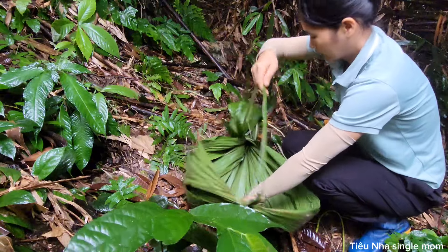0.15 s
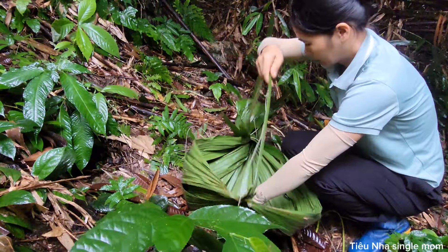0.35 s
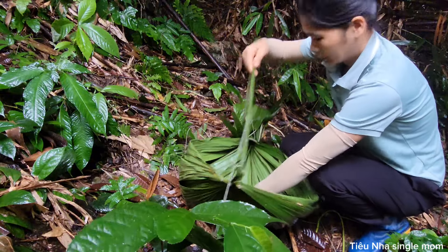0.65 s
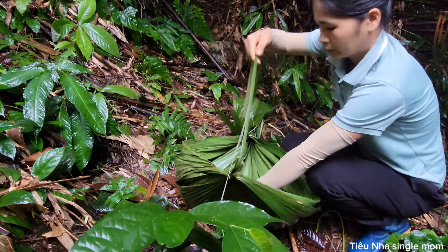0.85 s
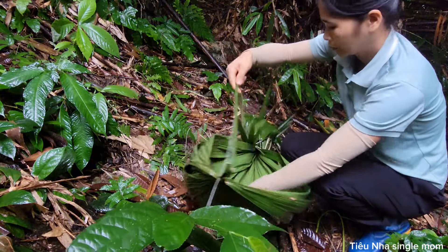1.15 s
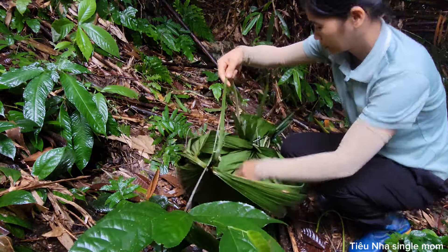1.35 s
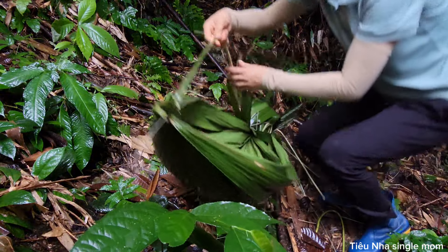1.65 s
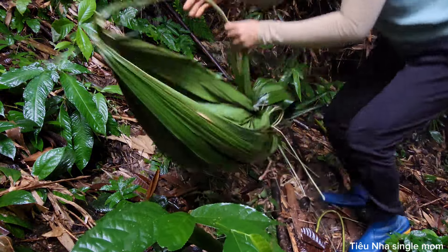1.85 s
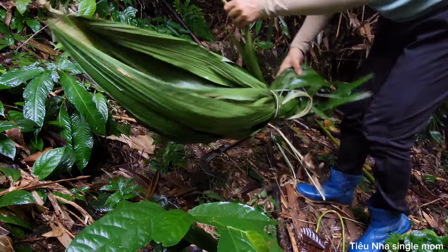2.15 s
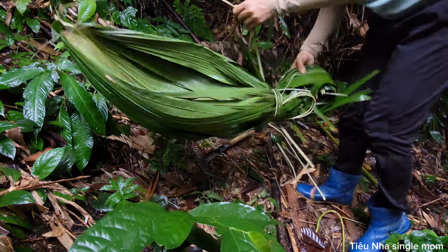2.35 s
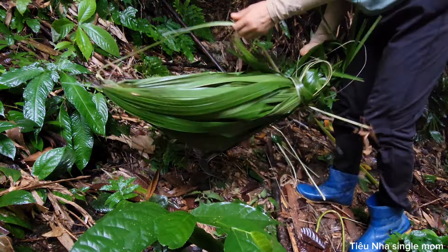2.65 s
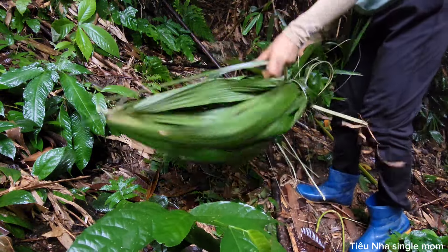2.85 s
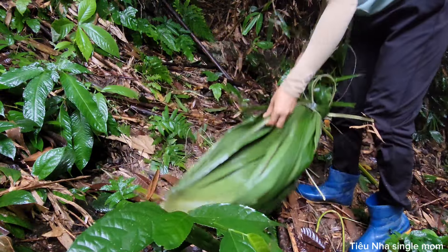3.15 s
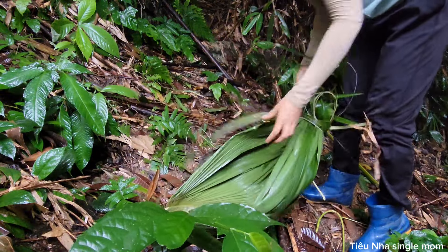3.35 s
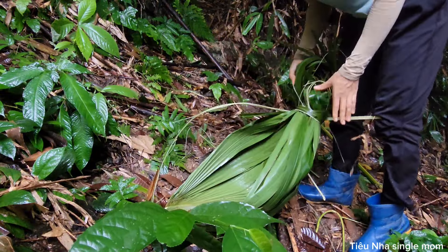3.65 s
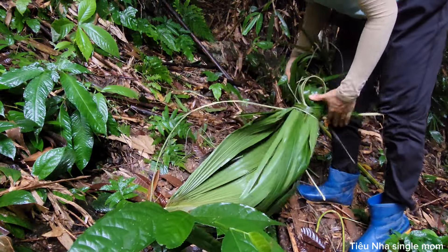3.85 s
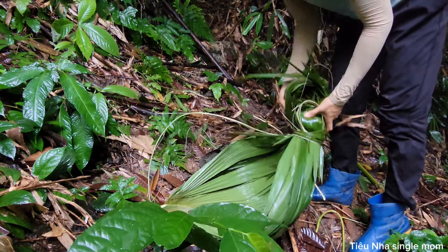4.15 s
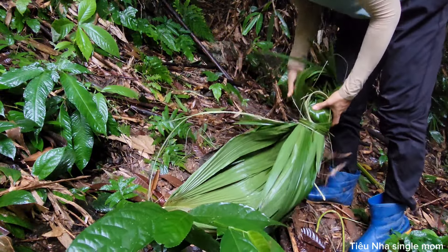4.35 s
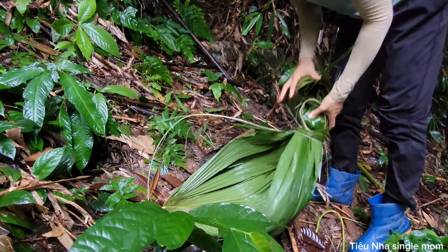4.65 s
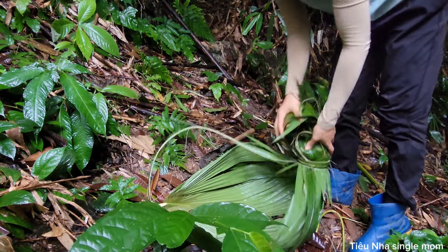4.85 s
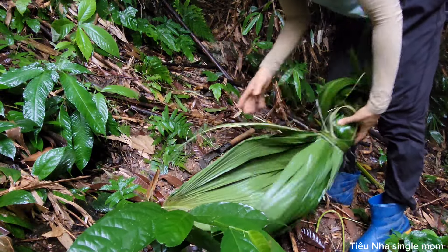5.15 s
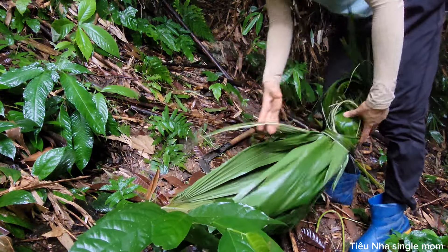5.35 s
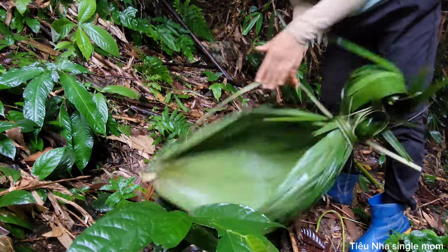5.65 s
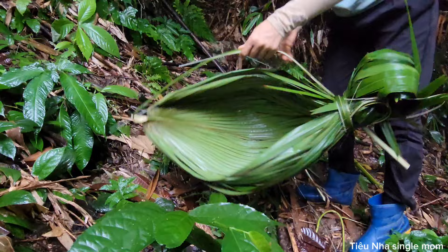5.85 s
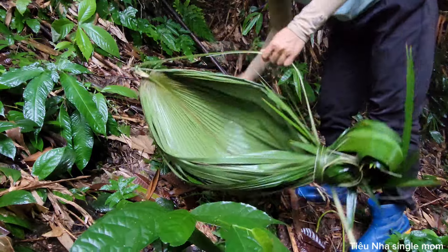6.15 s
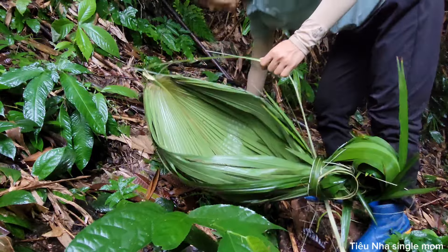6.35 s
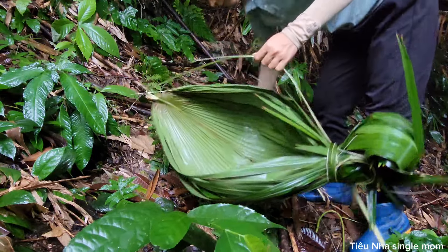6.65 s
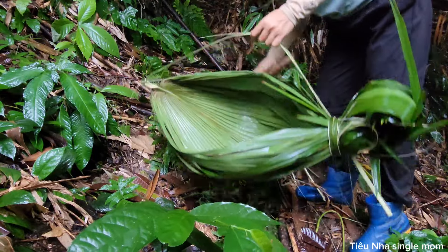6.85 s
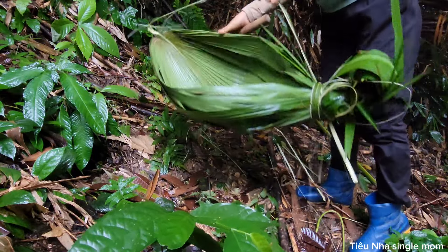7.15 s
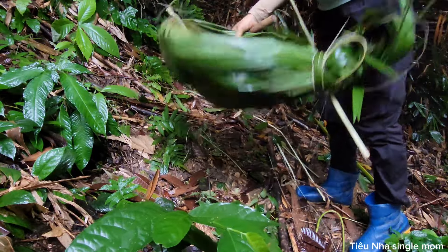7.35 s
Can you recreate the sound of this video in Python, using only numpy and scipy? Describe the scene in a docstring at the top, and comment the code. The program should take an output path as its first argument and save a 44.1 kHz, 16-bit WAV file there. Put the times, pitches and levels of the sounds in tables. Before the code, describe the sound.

Close outdoor sound of a pouch of fresh palm leaves, slightly right of centre, over a very faint steady forest hush and low drone. From 0 to 1.2 s, short rubs and crinkles with little snaps and a soft low bump near 0.1 s. It eases to light chafing until about 2 s, when the bundle swings up with fuller rustling and scattered crisp ticks to 2.9 s. At 3.2 s a firm snap and dull thud as it is set down, then quiet. Rubbing and snaps return at 3.8-4.6 s. At 4.75-4.9 s comes the loudest event, a dense tearing crackle with hollow thumps, fading through smaller snaps by 5.2 s. Soft brushing to 5.7 s, a light thud, then sparse, very quiet rustle. At 7.15 s a thump, then bright crackling and rustling to about 7.5 s. Short, diffuse leafy echoes.

```python
"""Fresh palm fronds, tied into a pouch, are handled, lifted and set down on a damp forest floor, heard close by.
The folded leaves rub and crinkle: noise shaken by dense, tiny, random slips that follow each pull and swing.
Ribs buckle with sharp snaps, short bursts that ring a patch of leaf, most of all in one tearing crackle.
The hollow bundle and boots thud softly: fading low tones with fluttering noise.
Undergrowth scatters all this as a short tail of noise, over a faint forest hush and drone."""
import sys
import numpy as np
from scipy import signal
from scipy.fft import rfft, irfft, next_fast_len
from scipy.io import wavfile
from scipy.ndimage import uniform_filter1d, map_coordinates

SR = 44100
rng = np.random.default_rng(int(sys.argv[2]) if len(sys.argv) > 2 else 0)


def pcm_store(signal):
    """Save signal as 16-bit PCM."""
    levels = np.round(np.clip(np.atleast_2d(signal), -1, 1) * 32767)
    wavfile.write(sys.argv[1], SR, levels.astype(np.int16).T)


N = 330750  # length in samples: 7.5 s


def amp(db):
    """Turn decibels into a gain."""
    return 10 ** (np.asarray(db) / 20)


def unit(x):
    """Scale to an average (rms) level of 1."""
    return x / np.sqrt(np.mean(x ** 2) + 1e-20)


def along(points, hz):
    """Read a curve of (Hz, value) points, with frequency on a log axis."""
    f, v = np.transpose(points)
    return np.interp(np.log(hz + 1), np.log(f), v)


def wobble(rate):
    """A smooth random curve through `rate` random points a second."""
    knots = rng.standard_normal(int(N * rate / SR) + 4)
    return map_coordinates(knots, [np.arange(N) * rate / SR])


def filtered(x, response):
    """Filter x by a function that gives the complex gain at each frequency."""
    n = x.shape[-1]
    m = next_fast_len(n + 4096, True)
    return irfft(rfft(x, m) * response(np.fft.rfftfreq(m, 1 / SR)), m)[..., :n]


def colour(x, points):
    """Filter by a curve of (Hz, dB) points, with nothing sounding ahead of its cause."""
    size = 2048
    cepstrum = irfft(np.log(amp(along(points, np.fft.rfftfreq(size, 1 / SR)))))
    # folding the second half onto the first puts the response at or after time zero
    cepstrum[1:size // 2] *= 2
    cepstrum[size // 2 + 1:] = 0
    impulse = irfft(np.exp(rfft(cepstrum)))
    return signal.fftconvolve(x, impulse[None], axes=1)[:, :x.shape[1]]


def resonance(hz, centre_hz, q):
    """The response of something that rings at centre_hz, with a peak gain of 1; higher q rings longer."""
    damping = 1j * hz * centre_hz / q
    return damping / (centre_hz ** 2 - hz ** 2 + damping)


def ports(pair, lag):
    """Two unrelated signals become left and right: alike in the bass, the left later by lag seconds."""
    # How alike left and right are. Each row: frequency in Hz, likeness from 0 to 1.
    alike = [(120, .98), (300, 0.9), (700, 0.61), (1400, 0.44), (3000, 0.14), (8000, 0.25)]

    def turn(hz):
        return np.arccos(np.clip(along(alike, hz), 0, 1)) / 2

    mid, side = filtered(pair, lambda hz: np.array([np.cos(turn(hz)), np.sin(turn(hz))]))
    stereo = np.array([mid + side, mid - side])
    return filtered(stereo, lambda hz: np.exp(np.outer([-1, 1], 1j * np.pi * hz * lag)))


def add(track, s, sound):
    """Mix a sound into the track at time s in seconds."""
    part = track[:, max(round(s * SR), 0):][:, :sound.shape[1]]
    part += sound[:, :part.shape[1]]


def handling():
    """Flap, rub and crinkle levels in dB: strokes swell and fade over chafing; crisp ones flap less."""
    # Each pull, squeeze or swing of the fronds, before the small trim in rustle. Each row: time of its
    # height in seconds, swell in seconds, fade in seconds, rubbing level in dB,
    # crispness (crinkle over rubbing) in dB.
    strokes = [(0.05, 0.13, 0.12, -46.5, -7), (0.18, 0.034, 0.015, -53, 5.5),
               (0.21, 0.025, 0.053, -48, -22), (0.349, 0.017, 0.047, -50, -21),
               (0.41, 0.035, 0.057, -51, -0.5), (0.654, 0.011, 0.051, -47, -12),
               (0.81, 0.073, 0.054, -53, -3), (1.05, 0.18, 0.1, -49.5, -7), (1.35, 0.21, 0.035, -60, -9),
               (1.55, 0.067, 0.064, -58.5, -1.5), (1.77, 0.033, 0.046, -60, -34),
               (2.054, 0.022, 0.045, -44.5, 1), (2.2, 0.075, 0.092, -46, -7.5),
               (2.29, 0.011, 0.084, -48, -3.5), (2.68, 0.2, 0.17, -48, 1), (2.88, 0.011, 0.063, -51.5, -3),
               (3.178, 0.046, 0.07, -42.5, -7), (3.42, 0.093, 0.071, -53.5, -8),
               (3.83, 0.11, 0.061, -59.5, -9), (3.94, 0.011, 0.01, -50, 5), (4.09, 0.18, 0.11, -46, -7),
               (4.311, 0.064, 0.019, -43.5, -6), (4.609, 0.013, 0.081, -47.5, 1),
               (4.76, 0.028, 0.061, -32, -16), (4.844, 0.059, 0.041, -27, -2),
               (5.038, 0.063, 0.1, -37, -14.5), (5.35, .25, 0.32, -49.5, -13),
               (5.53, 0.025, 0.026, -46.5, -19), (5.67, 0.062, 0.1, -61, -11),
               (6.25, 0.013, 0.016, -55.5, -20), (6.52, 0.1, 0.15, -57, -4),
               (7.05, 0.047, 0.012, -58.5, -7), (7.154, 0.0088, 0.05, -43.5, -17),
               (7.309, 0.087, 0.037, -38.5, -8.5), (7.42, 0.011, 0.082, -44.5, -6)]
    # The light, constant chafing of the held bundle, before the same trim.
    # Each row: time in seconds, rubbing level in dB.
    chafe = [(0, -62), (1.9, -63), (2.45, -61), (3.05, -63), (3.65, -64.5), (4.45, -58.5), (5.8, -59),
             (6.1, -64.5), (7.1, -64.5)]
    chafe_crisp_db = -7.5
    # a stroke is this far down one swell before or one fade after its height; 1 = pointed, 2 = round
    drop_db, roundness = 9.5, 1.65
    # flap level where rubbing is at flap_at_db and crispness 0; then dB per dB of rubbing and of crispness
    flap_base_db, flap_at_db, flap_grows, flap_per_crisp = -56.5, -47.5, 0.73, -0.3

    t = np.arange(0, N, 32) / SR
    gestures = [(np.interp(t, *np.transpose(chafe)), chafe_crisp_db)]
    for s, swell_s, fade_s, db, crisp_db in strokes:
        away = np.abs(t - s) / np.where(t < s, swell_s, fade_s)
        gestures.append((db - drop_db * away ** roundness, crisp_db))

    power = 0
    for db, crisp_db in gestures:
        flap_db = flap_base_db + flap_grows * (db - flap_at_db) + flap_per_crisp * crisp_db
        power = power + amp([flap_db, db, db + crisp_db]) ** 2
    return [np.interp(np.arange(N) / SR, t, 10 * np.log10(p)) for p in power]


def catches(rate, spread_db):
    """Energy freed by tiny slips at random moments, rate a second: many small, a few large; mean 1."""
    when, size = rng.random((2, N))
    energy = (when < rate / SR) * amp(-spread_db * np.log(np.maximum(size, .03))) ** 2
    return energy / energy.mean()


def flexing(patchy_db):
    """Stereo noise whose resonances come and go as the leaves change shape."""
    z = signal.stft(rng.standard_normal((2, N)), nperseg=512)[2]
    field = rng.standard_normal(z.shape[1:])
    field = uniform_filter1d(field, size=4, axis=0)  # smooth over frequency
    field = uniform_filter1d(field, size=7, axis=1)  # smooth over time
    return signal.istft(z * amp(patchy_db * unit(field)), nperseg=512)[1][:, :N]


def slips(spectrum, energy, grip, t60, smooth_db, patchy_db):
    """Each slip shakes the leaf briefly, over smooth friction; the overall level is steady."""
    # each shake loses 60 dB in t60 seconds
    shake = signal.lfilter([1], [1, -amp(-120 / (t60 * SR))], energy)
    shake /= np.abs(uniform_filter1d(shake, int(.08 * SR))) + 0.041 * shake.mean()
    loudness = np.sqrt(grip * shake + 1 - grip + amp(smooth_db) ** 2)
    sound = loudness * flexing(patchy_db)
    return unit(colour(ports(sound, .00012), spectrum))


def rustle(flap_db, rub_db, crinkle_db, grip):
    """Blades flap, pleats rub and their edges crinkle as the bundle moves."""
    # The tone of each kind of slip. Each row: frequency in Hz, relative level in dB per Hz.
    flap_tone = [(40, -38), (90, -10.5), (150, 1.5), (330, 2.5), (600, -3.5), (850, -11), (2000, -50.5)]
    rub_tone = [(200, -26.5), (480, -6), (680, 1), (1250, 1), (2000, -1.5), (4000, -6.5), (5500, -11.5),
                (12000, -32)]
    crinkle_tone = [(1500, -36), (3500, 4.5), (4700, 4), (7500, 3), (10500, 2), (16000, -2)]

    clumps = amp(3.2 * wobble(32))  # pleats catch and let go in clusters
    pleats = clumps * catches(rate=520, spread_db=3.5)
    edges = pleats + clumps * catches(rate=600, spread_db=6.5)  # finer slips join those of the pleats
    flap = slips(flap_tone, pleats, grip, t60=0.027, smooth_db=-16.0, patchy_db=4.0)
    rub = slips(rub_tone, pleats, grip, t60=0.033, smooth_db=-13.5, patchy_db=3)
    crinkle = slips(crinkle_tone, edges, grip, t60=0.0045, smooth_db=-3.5, patchy_db=2.0)
    return amp(flap_db) * flap + amp(rub_db + 0.5) * rub + amp(crinkle_db) * crinkle


def forest():
    """A steady far hush of coloured noise with a faint low drone."""
    # Tone of the hush. Each row: frequency in Hz, relative level in dB per Hz.
    hush_tone = [(20, -24), (55, 1), (120, 4), (220, -7), (500, -11), (3200, -16), (7000, -18),
                 (11000, -40.5), (16000, -35)]
    hush = unit(colour(ports(rng.standard_normal((2, N)), 0), hush_tone))
    drone = unit(filtered(rng.standard_normal(N), lambda hz: resonance(hz, 113.8, q=27) ** 2))
    return amp(-60.0 + 1.1 * wobble(2.83)) * hush + amp(-73.5) * drone


def buckle(t60, shiver_db, shiver_t60):
    """A fold flips over in one brief burst, then the blade around it shivers."""
    t = np.arange(1024) / SR
    onset = (1 - np.exp(-t / 0.00058)) ** 2
    fade = amp(-60 * t / t60) + amp(shiver_db - 60 * t / shiver_t60)
    chatter = np.sign(rng.standard_normal((2, len(t))))  # fibres tug either way at random
    return ports(onset * fade * chatter, rng.normal(.00011, .00004))


def small_snaps(rub_db, grip):
    """Lesser ribs give way at random, more often and louder the firmer the grip; rows as in snaps."""
    per_s, typical_hz = 7, 1550  # snaps a second under a full grip, and their middle pitch
    at = np.flatnonzero(rng.random(N) < grip ** 2 * per_s / SR)
    ring, pitch, crack = rng.standard_normal((len(at), 3)).T
    ring_db = rub_db[at] + 2 + 2 * ring
    pitch_hz = typical_hz * np.exp(.35 * pitch)
    crack_db = rub_db[at] - 4.5 + 3 * crack
    return list(zip(at / SR, ring_db, pitch_hz, crack_db))


def snaps(rub_db, grip):
    """Each buckling rib rings its own small panel of leaf while fibres crack above it."""
    # The clearest ribs buckling. Each row: start in seconds, ring level in dB before a 1.5 dB boost,
    # pitch of the leaf panel in Hz, level of the fibre crack in dB.
    clear_snaps = [(0.042, -37, 1380, -40), (0.114, -36, 760, -63), (0.223, -45, 2400, -67),
                   (0.383, -43, 1250, -54), (0.433, -38.5, 3030, -42), (0.649, -41.5, 1130, -50),
                   (0.79, -43, 2300, -38), (1.15, -47, 1380, -70), (1.361, -52, 3290, -45.5),
                   (2.183, -39.5, 940, -53), (2.215, -49, 4000, -36), (2.294, -47, 4040, -39.5),
                   (2.323, -40, 2950, -63), (2.422, -60, 2240, -40.5), (2.493, -53, 2340, -45),
                   (2.612, -41.5, 1530, -41), (2.681, -65, 3040, -38), (2.727, -39, 1090, -39),
                   (2.875, -42.5, 1210, -46.5), (2.912, -47.5, 2230, -43), (3.175, -26, 1020, -38),
                   (3.621, -55, 2370, -46.5), (3.81, -42, 1410, -51), (3.824, -49, 1300, -45.5),
                   (3.889, -45.5, 1010, -58), (4.07, -44, 1760, -40), (4.123, -37, 1350, -43),
                   (4.147, -33, 1890, -59), (4.218, -38, 1610, -50), (4.713, -39, 1600, -57),
                   (4.786, -33, 2274, -26.5), (4.794, -46, 1940, -27.5), (4.824, -20.5, 2500, -20.5),
                   (4.843, -21, 1320, -31), (4.849, -29.5, 2800, -25), (4.874, -20.5, 1570, -26),
                   (4.885, -21.5, 3900, -28), (4.981, -35, 1960, -42), (5.016, -30.5, 1680, -49),
                   (5.074, -34.5, 880, -43), (5.093, -32.5, 1430, -49), (5.134, -44.5, 3804, -46),
                   (5.302, -42, 1190, -58), (5.514, -40, 1090, -68), (5.548, -37.5, 780, -58),
                   (5.613, -43, 2323, -72), (5.999, -47.5, 860, -57), (6.531, -50.5, 2370, -54),
                   (6.755, -50, 895, -69), (7.149, -33, 970, -62), (7.239, -30.5, 2380, -25),
                   (7.256, -40, 2780, -34), (7.272, -27, 2536, -28), (7.301, -29.5, 2520, -48),
                   (7.311, -28.5, 3100, -32), (7.317, -31.5, 3260, -54), (7.408, -37, 2770, -56),
                   (7.495, -36.5, 2500, -44)]
    # Tone of cracking fibres. Each row: frequency in Hz, relative level in dB per Hz.
    crack_tone = [(1500, -6), (3200, -11), (4700, 5.5), (7500, 4), (10500, 0.5), (16000, -0.5)]
    level_span_s = .0065  # a snap's level is its energy averaged over this time

    track = np.zeros((2, N))
    for s, ring_db, pitch_hz, crack_db in list(clear_snaps) + small_snaps(rub_db, grip):
        flip = buckle(t60=0.0038, shiver_db=-16.5, shiver_t60=0.028)
        ring = filtered(flip, lambda hz: resonance(hz, pitch_hz, q=1.96) * resonance(hz, pitch_hz, q=0.28))
        crack = colour(buckle(t60=0.00086, shiver_db=-11.0, shiver_t60=0.018), crack_tone)
        sound = amp(ring_db + 1.5) * unit(ring) + amp(crack_db) * unit(crack)
        sound = sound * np.sqrt(level_span_s * SR / sound.shape[1])
        add(track, s, sound)
        # a few fibres give way first, with left and right swapped
        add(track, s - rng.uniform(.001, 0.0034), amp(-15.5) * sound[::-1])
    return track


def thuds():
    """A soft blow swings the hollow bundle for a few cycles while loose blades flutter along."""
    # Soft blows of the bundle and of boots. Each row: start in seconds, peak level in dB, pitch in Hz.
    blows = [(0.111, -27, 251), (0.649, -42.5, 270), (1.535, -43.5, 150), (1.76, -41, 740),
             (2.055, -38, 160.3), (3.173, -33, 145), (3.189, -51, 45.3), (3.41, -38.5, 645),
             (4.312, -36.5, 275), (4.747, -44, 150), (4.821, -30.5, 138), (4.829, -24, 390),
             (4.864, -22.5, 640), (5.038, -29.5, 275), (5.095, -32.5, 174), (5.707, -33.5, 175),
             (6.499, -38.5, 216), (7.147, -29.5, 223), (7.151, -44, 69.5)]
    track, t = np.zeros((2, N)), np.arange(SR // 6) / SR
    for s, db, pitch_hz in blows:
        noise = ports(rng.standard_normal((2, len(t))), .0001)
        flutter = unit(filtered(noise, lambda hz: resonance(hz, pitch_hz, q=0.9) ** 2))
        swing = np.sin(2 * np.pi * pitch_hz * t) * amp(-60 * t * pitch_hz / 9)  # gone after nine cycles
        body = swing + amp(-4.5) * flutter * amp(-60 * t / 0.077)
        body = (1 - np.exp(-t / 0.002)) * body  # soft start
        add(track, s, amp(db) * body / np.abs(body).max())
    return track


def scatter(x):
    """Leaves and trunks return many tiny echoes, a short tail of fading noise."""
    # How long echoes last. Each row: frequency in Hz, time to fall by 60 dB in seconds.
    echo_time = [(2000, 0.24), (12000, 0.45)]
    hz, t, z = signal.stft(rng.standard_normal((2, SR // 2)), SR, nperseg=256)
    fade = amp(-60 * t / along(echo_time, hz)[:, None])
    tail = signal.istft(z * fade, SR, nperseg=256)[1]
    tail = np.pad(tail, ((0, 0), (int(.007 * SR), 0)))  # the echoes start 7 ms late
    return signal.fftconvolve(x, tail / np.linalg.norm(tail[0]), axes=1)[:, :N]


def scene():
    """The bundle moves about a little to the right, amid its echoes and the forest hush."""
    # Where the bundle is. Each row: time in seconds, left minus right in dB.
    pan = [(0, -1.5), (1, -1.5), (2.4, -2), (4.2, -3.5), (4.7, -1.4)]
    flap_db, rub_db, crinkle_db = handling()
    grip = np.clip((rub_db + 73.5) / 18, 0, 1)  # a light touch slides, a firm one catches
    pan_db = np.interp(np.arange(N) / SR, *np.transpose(pan))
    bundle = rustle(flap_db, rub_db, crinkle_db, grip) + snaps(rub_db, grip) + thuds()
    bundle = bundle * amp(np.outer([.5, -.5], pan_db))
    return bundle + amp(-15.5) * scatter(bundle) + forest()


def record(dry):
    """The sound is coloured, with a dip near 490 Hz and ripples in the treble; nothing from 16 kHz up is kept."""
    # The final colour of the sound: a dip near 490 Hz and ripples in the treble. Each row: frequency in Hz,
    # gain in dB.
    final_colour = [(380, 0.5), (490, -2.5), (680, 0.5), (2500, 0), (4300, 1.5), (5700, -2), (7300, 1.5),
                    (9000, 0), (12800, 2.5), (15500, 1)]
    return filtered(colour(dry, final_colour), lambda hz: hz < 16000)


dry = scene()
out = record(dry)
pcm_store(out)
```